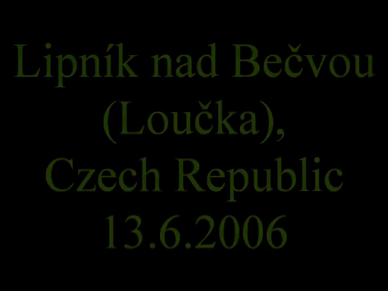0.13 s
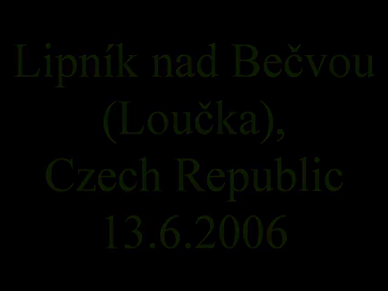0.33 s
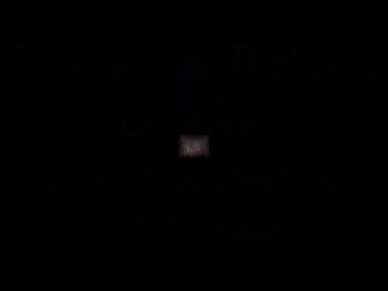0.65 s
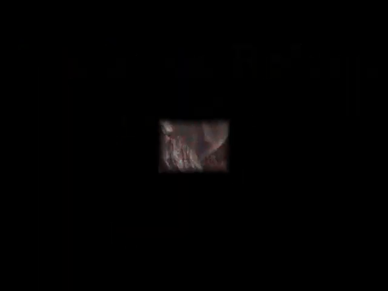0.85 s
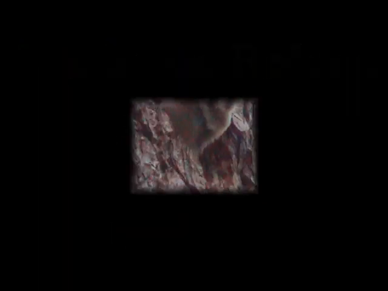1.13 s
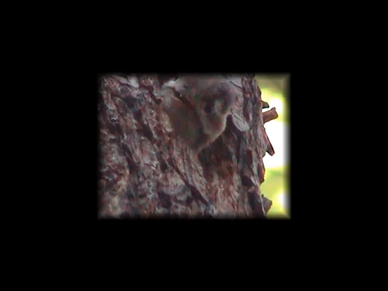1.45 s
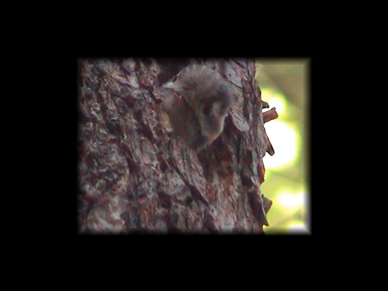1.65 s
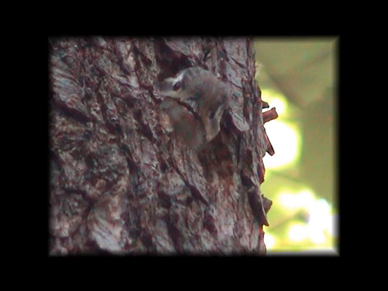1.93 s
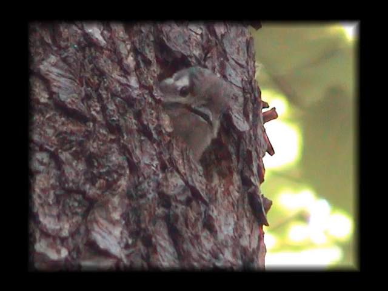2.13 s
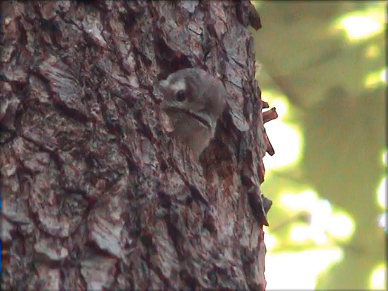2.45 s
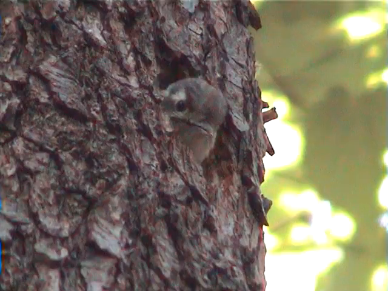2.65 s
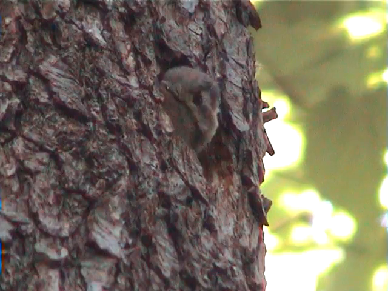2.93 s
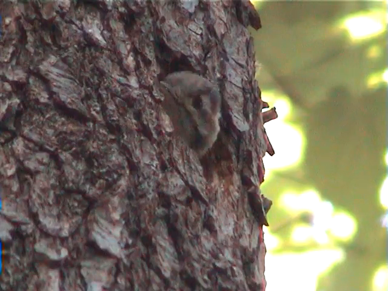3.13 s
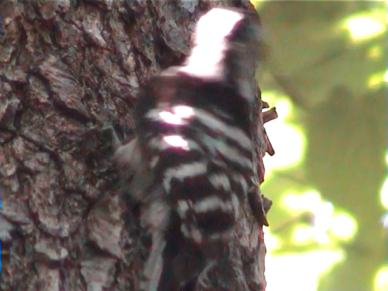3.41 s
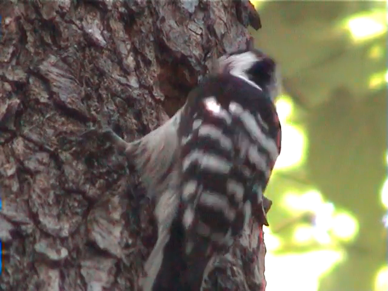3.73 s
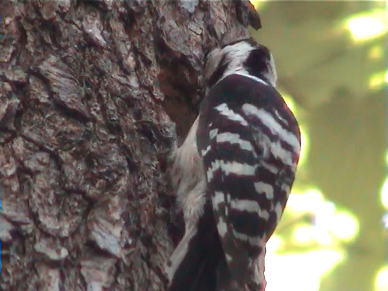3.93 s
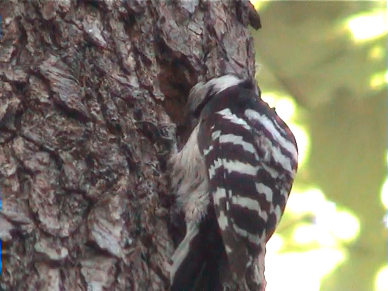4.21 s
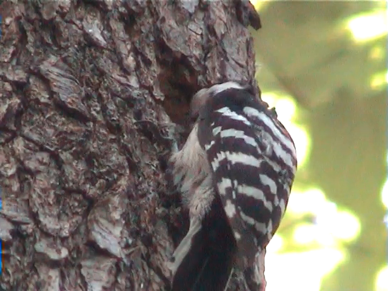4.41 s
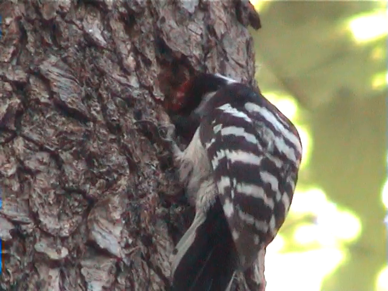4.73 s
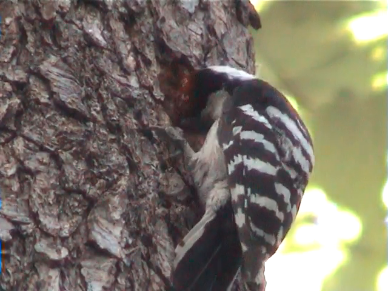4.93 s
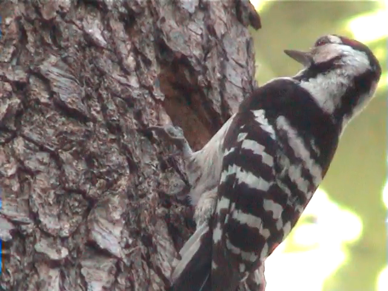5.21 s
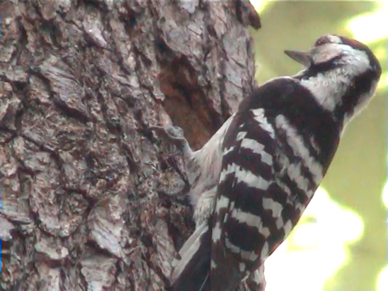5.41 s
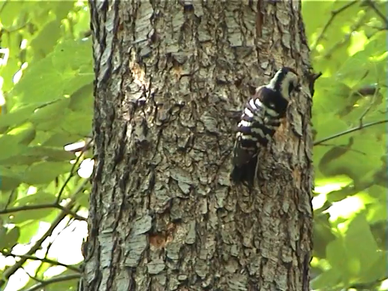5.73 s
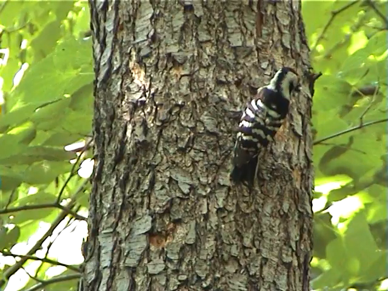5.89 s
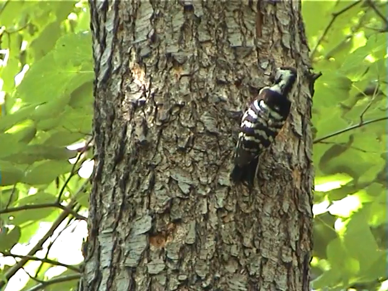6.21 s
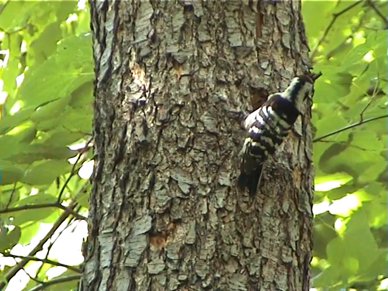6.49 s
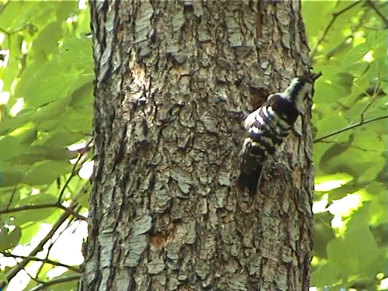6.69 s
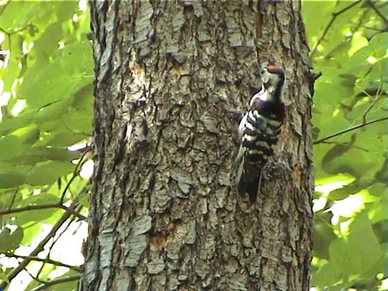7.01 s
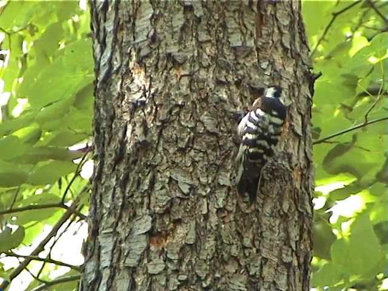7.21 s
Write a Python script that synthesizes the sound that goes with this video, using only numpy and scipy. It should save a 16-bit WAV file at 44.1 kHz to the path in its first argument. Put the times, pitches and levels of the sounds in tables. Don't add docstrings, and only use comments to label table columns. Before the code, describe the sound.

Woodpecker chicks beg from a tree hole in rapid, thin, bright peeps over leafy rush; feeding muddles them before a second nest begs more slowly.

```python
import sys
import numpy as np
from scipy import signal
from scipy.fft import rfft, irfft, next_fast_len
from scipy.io import wavfile
from scipy.ndimage import uniform_filter1d, map_coordinates

SR = 44100
rng = np.random.default_rng(int(sys.argv[2]) if len(sys.argv) > 2 else 0)


def store_pcm(level_fs):
    pcm = np.round(np.clip(level_fs, -1, 1) * 32767).astype(np.int16)
    wavfile.write(sys.argv[1], SR, np.atleast_2d(pcm).T)


def rack_gain(trim_db):
    fader = np.asarray(trim_db, float)
    return 10 ** (fader / 20)


N = 324135

# start in seconds, length in seconds,
# middle pitch in Hz, level of the 1st partial in dB, beak opening (2nd partial over 1st) in dB.
HEAD_OUT = [(.668, 0.033, 2795, -41, 10.5), (.775, 0.035, 3007, -36.5, 16), (.884, 0.031, 3066, -36, 17.5),
            (.991, 0.032, 3050, -37, 18), (1.098, 0.026, 2995, -35.5, 17), (1.2, 0.032, 3013, -35.5, 16),
            (1.306, 0.026, 3035, -34, 17.5), (1.411, 0.033, 3110, -35.5, 19), (1.63, .034, 3060, -34.5, 18),
            (1.749, .029, 3023, -35.5, 20), (1.862, 0.027, 3040, -34, 18.5), (1.974, 0.03, 3078, -34.5, 18),
            (2.087, 0.029, 3014, -34, 17), (2.198, 0.025, 3022, -34.5, 15.5),
            (2.312, 0.026, 3057, -34.5, 17)]
CRANING = [(1.521, .032, 3080, -34, 18), (2.42, 0.0309, 3100, -34, 16.9), (2.533, 0.029, 3150, -32.5, 16.9),
           (2.653, .029, 3122, -33.5, 16.9), (2.769, .031, 3020, -34.5, 17.4),
           (2.885, 0.028, 3150, -33, 15.1), (2.997, 0.031, 3097, -36, 18), (3.113, 0.029, 3067, -35, 15.2),
           (3.227, 0.029, 3140, -36, 16.7), (3.46, .03, 3130, -35.5, 4.9)]
DUCKING = [(3.335, .034, 3127, -35, 3.5), (4.19, 0.037, 3146, -37, -0.5), (4.33, 0.035, 3140, -37, 1.5),
           (7.081, 0.038, 3064, -36.5, -1.5)]
HIDDEN = [(3.699, 0.027, 3013, -36.5, -1.5), (3.817, 0.029, 3020, -36, -0.5),
          (3.937, .029, 3000, -37.5, -1), (4.068, 0.029, 3050, -37, -1.5)]
LEAD_INS = [(4.449, 0.008, 2750, -43.5, -9), (4.621, 0.0079, 2490, -43, -15), (6.68, 0.014, 2886, -35.5, -1.5)]
FED = [(4.473, 0.039, 3243, -31, -1.5), (4.641, 0.052, 3070, -36.5, -3), (4.85, 0.031, 3073, -35.5, -2),
       (5.021, 0.045, 3074, -38, -8)]
SLIPPING = [(5.209, .028, 2784, -38, -15.5)]
FAINT = [(3.579, 0.038, 3570, -39, -10.5), (5.347, 0.018, 3540, -47.5, -38)]
SINKING = [(5.526, 0.029, 3006, -49.5, 8.6), (6.693, 0.037, 3050, -33.5, 3.1),
           (7.106, 0.017, 3000, -33, 4.4)]
STRETCHING = [(5.65, 0.043, 3034, -42.5, -1.5), (5.804, 0.041, 3190, -37, 2), (5.944, .057, 3203, -34, 7)]
GAPING = [(6.11, .046, 2950, -34, 3), (6.276, 0.05, 2996, -34, 3.5), (6.492, 0.049, 2970, -36.5, 2.5),
          (6.88, 0.039, 3134, -36, 1), (7.31, 0.043, 3060, -34.5, -.5)]
FED_RASP, GAPING_RASP = .36, .08

# squeak before in dB, squeak after in dB, rasp from 0 to 1.
POSTURES = [
    (HEAD_OUT, (0.096, 0.792, 0.683, 0.066, 0.65), (-10, -12.5, -10.5, -10), (-13, -9, 0.036)),
    (CRANING, (.4, 0.87, 0.664, 0.14, 0.56), (-7, -13, -12.5, -10.5), (-12.5, -6, 0.017)),
            (DUCKING, (0.99, 1, 0.88, 0.77, 0.56), (-6, -3.5, -6, -9), (-13.5, -2.5, .08)),
    (HIDDEN, (1.35, 1.16, 0.86, 0.75, 1.3), (0.5, 2, -8, -11), (-15, -1.7, .08)),
    (LEAD_INS, (0.45, 0.92, 1.5, 1.17, .99), (13, 11, -2, -12), (-16.5, -40, 0.19)),
    (FED, (0.59, .9, 1, 0.8, 0.76), (-2, 0, -13.5, -11.5), (-12, -13.5, FED_RASP)),
    (SLIPPING, (2.2, 2.63, 0.13, .1, 0.69), (11, 7, -16, -7), (-13, -2.3, 0.26)),
    (FAINT, (1.31, 1.12, 1.02, 0.8, 0.67), (-1, -1, -11, -21), (-12.5, -12, 0.31)),
            (SINKING, (1.5, 1.53, 0.52, 0.16, -0.073), (6.5, -2.5, -19, -22), (-41, -16, 0.062)),
    (STRETCHING, (0.155, .88, 0.74, 0.16, 0.66), (-4.5, -0.5, -27, -25), (-15, -10.5, 0.059)),
    (GAPING, (.7, 1, 0.52, 0.15, 0.95), (-3, 6, -7, -14), (-14, -6.5, GAPING_RASP)),
]

# seconds from the note's start, pitch in Hz, level in dB.
SQUEAK_IN = [(-.022, 2555, -10), (-.012, 3177, -2), (-.006, 3605, -3.5), (-.004, 3894, 6), (0, 3050, 17),
             (.002, 2886, 9)]
# seconds from the note's end, pitch in Hz, level in dB.
SQUEAK_OUT = [(-.002, 3200, 14), (.003, 3750, -10), (.009, 3550, -13.5), (.02, 3000, -11)]
# left minus right in dB, left's lead in radians.
PORTS = [(-2.5, 0.051), (-0.1, 0.47), (1, 0.66), (1, 0.71), (0.3, 1.2)]
# start in seconds, peak in dB, time to fall 15 dB in
# seconds.
CLAWS = [
    (3.314, -27, 0.022),
    (3.443, -31, 0.0069),
    (4.457, -35, 0.012),
    (4.62, -34.5, 0.027),
    (5.223, -37, .005),
]
# frequency in Hz, time to fall 60 dB in seconds.
WOOD = [(2000, 0.57), (6000, 0.68), (9000, 0.45), (14000, 0.045)]
# frequency in Hz, level in dB per Hz.
RUSH = [(15, -32), (25, -2), (394, -1), (1940, -6), (2220, -6), (2610, -3.5), (2910, -2), (3160, -7.5),
        (5570, -12), (6210, -7.5), (7110, -17), (14000, -18), (16000, -16)]
# frequency in Hz, level in dB per Hz.
RUMBLE = [(15, -30), (28, -28), (55, -2.5), (80, -20), (100, -4), (125, -23.5), (170, -36), (300, -71)]
# time in seconds, level in dB.
RUSH_LEVEL = [(0, -47.5), (2.5, -48), (4, -47.5), (5.5, -49), (5.54, -48.5), (7.35, -48.5)]
# frequency in Hz, likeness from 0 to 1.
ALIKE = [(30, 1), (80, 0.97), (150, 0.033), (500, 0.62), (1500, 0.3), (5000, 0.56), (12000, 0.033)]
# frequency in Hz, left minus right in dB.
LEAN = [(30, -2), (300, -2), (1000, -3.5), (4000, -1.5), (12000, -1)]
# frequency in Hz, level in dB.
MOTOR = [(1087, -65.5), (1572, -64.5), (1916, -65.5), (2024, -68)]
# frequency in Hz, level in dB.
MIC = [(20, 0), (11100, 0), (12500, -7), (13200, -10), (15700, -10), (16200, -40)]

REST_HZ = 2500
OPENS_UPPER = 0.6
FIFTH_UNDER_DB = 12.5
SCATTER, SQUEAK_SCATTER_DB = 0.0387, 2.5
SETTLE_DB, SETTLE_S = 9, .0009
BARK_S, BARK_DB = 0.038, 15
FADE_START_S, FADE_END_S, SECOND_NEST_S = .52, 2.52, 5.524
BEFORE = SR // 32


def chicks():
    out = np.zeros((2, N + SR))
    for notes, arch, overtones, edges in POSTURES:
        for start, *note in notes:
            first = round(start * SR) - BEFORE
            out[:, first:first + SR // 8] += peep(*note, arch, overtones, edges)
    return out[:, :N]


def peep(length, middle_hz, first, open_db, shape, overtones, edges):
    side = np.array([[.5], [-.5]])
    t = np.arange(-BEFORE, SR // 8 - BEFORE) / SR
    u = np.clip(t / length, 0, 1)
    early_db, late_db, third, fourth = overtones
    third = first + third + OPENS_UPPER * open_db
    fourth = first + fourth + OPENS_UPPER * open_db
    in_db, out_db = np.add(edges[:2], SQUEAK_SCATTER_DB * rng.standard_normal(size=2))
    rasp = edges[-1]

    heights = np.insert(shape[:-1] + SCATTER * rng.standard_normal(size=4), 2, 1)
    hz = REST_HZ + (middle_hz - REST_HZ) * heights
    arch = np.interp(u, (0, .2, .5, .75, np.clip(shape[-1], .76, 1)), hz)
    span = round(length * SR / 7)
    arch = uniform_filter1d(uniform_filter1d(arch, size=span), size=span)
    drop = 450 * np.exp(-np.maximum(t + 0.0029, 0) / 0.00076) * rack_gain(in_db / 4)
    unsteady = 1 + 0.0034 * wobble(438, size=len(t))
    phase = 2 * np.pi * np.cumsum((arch + drop) * unsteady) / SR

    clear = 1 / (1 + np.exp((.0008 - t) / .0006)) / (1 + np.exp((t - length) / .0012))
    swell = clear * rack_gain(3 * np.sin(np.pi * u) ** .35 - 1.6 - 9 * u ** 5)
    second = first + open_db + np.array([early_db, 0, 0, late_db])
    beak = uniform_filter1d(np.interp(u, (.12, .36, .62, .85), second), size=2 * span)
    tire = 30 * rasp * (u - .4)
    levels = [first + 2.4 - 4 * u, beak, third - tire, fourth - tire, fourth - FIFTH_UNDER_DB - tire]

    note = 0
    turns = rng.standard_normal((5, 2))
    for k, (db, (lean_db, lead), (a, b)) in enumerate(zip(levels, PORTS, turns)):
        turned = .25 + .2 * k ** 2
        settle = SETTLE_DB * k * np.exp(-np.maximum(t, 0) / SETTLE_S)
        flutter = (1.0 + 9.8 * rasp * k) * wobble(165.8, size=len(t))
        gain = rack_gain(db - settle + flutter + side * (lean_db + 0.86 * turned * a))
        rough_phase = 1.1 * (rasp * k) ** 2 * wobble(500, size=len(t))
        note = note + gain * np.sin((k + 1) * phase + rough_phase + side * (lead + .3 * turned * b))

    hz_in, db_in = squeak(SQUEAK_IN, t)
    hz_in += (hz[0] - SQUEAK_IN[-1][1]) * np.exp(np.minimum(t, 0) / 0.00267)
    hz_out, db_out = squeak(SQUEAK_OUT, t - length)
    bright_db = .7 * (third - first)
    rough = hoarse(hz_in, first + in_db + db_in, bright_db)
    rough = rough + hoarse(hz_out, first + out_db + db_out, bright_db)
    rough = (1 - clear) * rough
    return np.sqrt(2) * (swell * note + rough * rack_gain(side * PORTS[0][0]))


def squeak(shape, t):
    s, hz, db = np.transpose(shape)
    return np.interp(t, s, hz), np.interp(t, s, db, left=-90, right=-90)


def hoarse(hz, db, bright_db):
    size = len(hz)
    phase = 2 * np.pi * np.cumsum(hz * (1 + .035 * wobble(600, size=size))) / SR
    upper = .45 * np.sin(2 * phase) + .2 * np.sin(3 * phase) + .45 * hiss(size)
    return rack_gain(db + 3.3 * wobble(500, size=size)) * (np.sin(phase) + rack_gain(bright_db) * upper)


def hiss(size):
    return np.convolve(rng.standard_normal(size), (.5, .5, 0, -.5, -.5), "same")


def claws():
    out, t = np.zeros(N), np.arange(SR // 10) / SR
    for start, db, t60 in CLAWS:
        out[round(start * SR):][:len(t)] += rack_gain(db - 10 - 60 * t / (4 * t60)) * hiss(len(t))
    return out


def forest(x):
    out, step = np.zeros((2, N + 2 * SR)), SR // 4
    for i in range(0, N, step):
        hz, t, z = signal.stft(rng.standard_normal((2, SR // 2)), SR, nperseg=256)
        far = rack_gain(-60 * t / along(WOOD, hz)[:, None])
        near = rack_gain(BARK_DB - 60 * t / BARK_S)
        tail = signal.istft(z * (far + near), SR, nperseg=256)[1]
        tail[1] = .75 * tail[0] + .62 * tail[1]
        wet = signal.fftconvolve(x[None, i:i + step], tail / np.linalg.norm(tail[0]), axes=1)
        out[:, i + 300:i + 300 + wet.shape[1]] += wet
    return out[:, :N]


def air():
    t = np.arange(N) / SR
    leaves_db = np.interp(t, *np.transpose(RUSH_LEVEL)) + .4 * wobble(3, size=N)
    leaves = rack_gain(leaves_db) * rush(RUSH, patchy_db=.8)
    rumble = rack_gain(-56 + .3 * wobble(8, size=N)) * rush(RUMBLE, patchy_db=.3)
    return leaves + (t > SECOND_NEST_S) * rumble


def rush(spectrum, patchy_db):
    z = signal.stft(rng.standard_normal((2, N + 512)), nperseg=512)[2]
    field = uniform_filter1d(rng.standard_normal(z.shape[1:]), 6, 0)
    field = uniform_filter1d(field, 14, 1)
    pair = signal.istft(z * rack_gain(patchy_db * unit(field)), nperseg=512)[1][:, :N]
    m = next_fast_len(N)
    hz = np.fft.rfftfreq(m, 1 / SR)
    turn = np.arccos(np.clip(along(ALIKE, hz), -1, 1)) / 2
    mid, side = rfft(pair, m) * rack_gain(along(spectrum, hz)) * [np.cos(turn), np.sin(turn)]
    lean = rack_gain(along(LEAN, hz) / 2)
    return unit(irfft([(mid + side) * lean, (mid - side) / lean], m)[:, :N])


def motor():
    t = np.arange(N) / SR
    whine = np.zeros(N)
    for hz, db in MOTOR:
        level = rack_gain(db - 2 + 3 * wobble(6, size=N))
        whine += level * np.sin(2 * np.pi * hz * t + 2.2 * wobble(11, size=N))
    return whine * rack_gain([[1.5], [-1.5]])


def unit(x):
    return x / np.sqrt(np.mean(x ** 2) + 1e-20)


def along(points, hz):
    f, v = np.transpose(points)
    return np.interp(np.log(hz + 1), np.log(f + 1), v)


def wobble(rate, size):
    knots = rng.standard_normal(16 + size // 16)
    return map_coordinates(knots, [np.arange(size) * rate / SR])


def scene():
    birds = chicks() + claws()
    echo = rack_gain(-9.5) * forest(birds.mean(axis=0))
    return birds + echo + air() + motor()


def low_pass(x):
    return signal.sosfilt(signal.butter(12, 16620, fs=SR, output="sos"), x)


def record(dry):
    m = next_fast_len(N)
    response = rack_gain(along(MIC, np.fft.rfftfreq(m, 1 / SR)))
    heard = irfft(rfft(dry, m) * response, m)[:, :N]
    fade = np.interp(np.arange(N) / SR, (FADE_START_S, FADE_END_S), (0, 1))
    return low_pass(heard * fade)


dry = scene()
out = record(dry)
store_pcm(out)
```